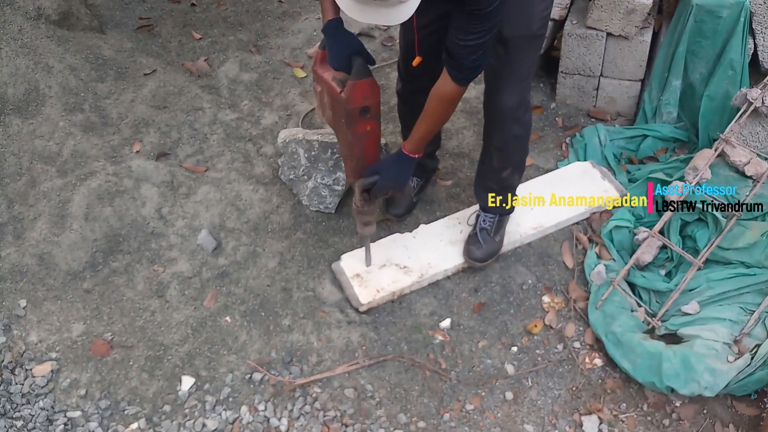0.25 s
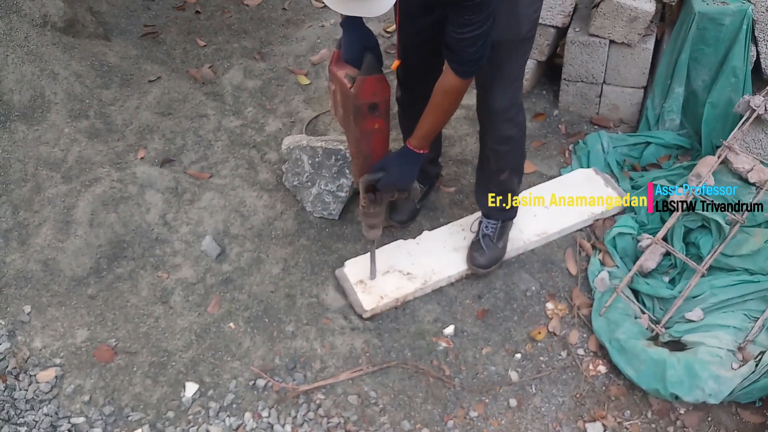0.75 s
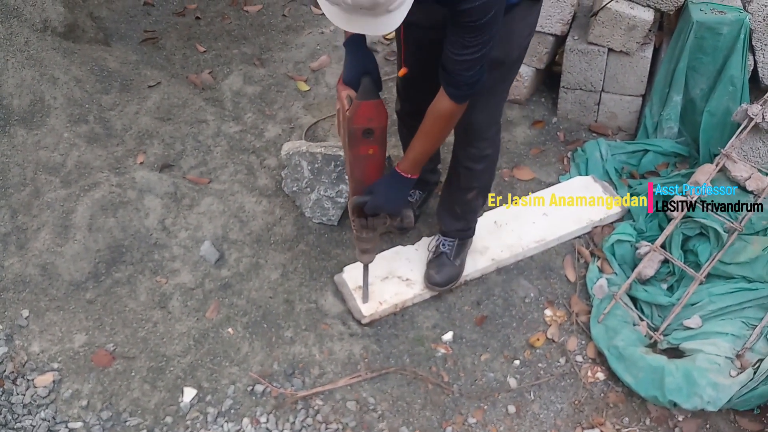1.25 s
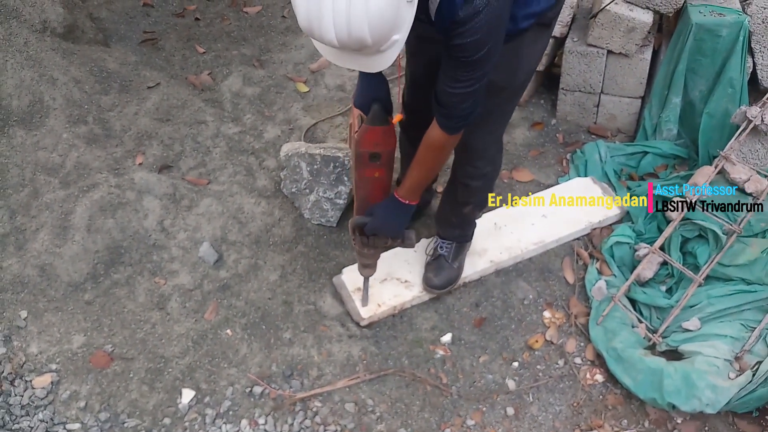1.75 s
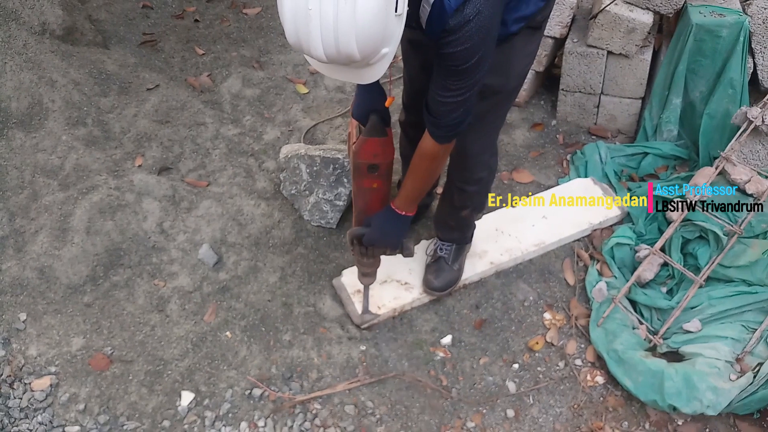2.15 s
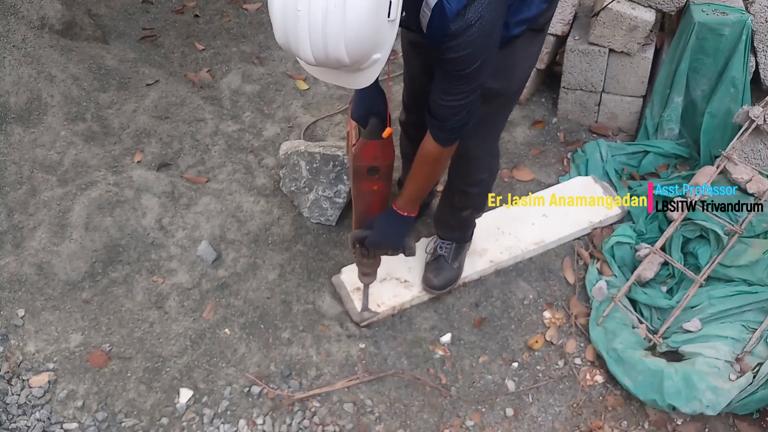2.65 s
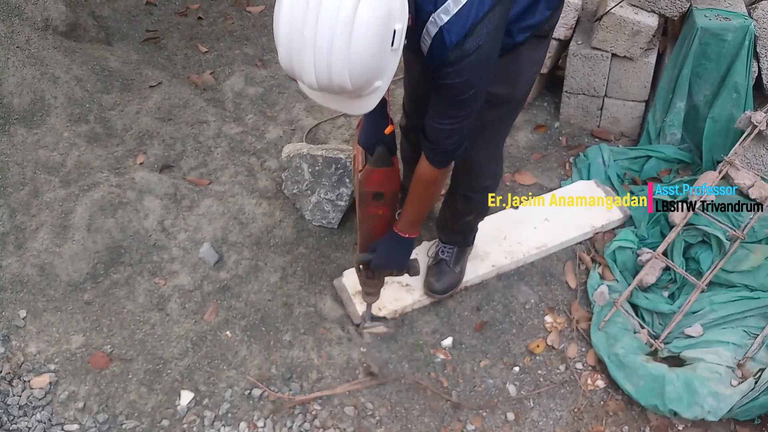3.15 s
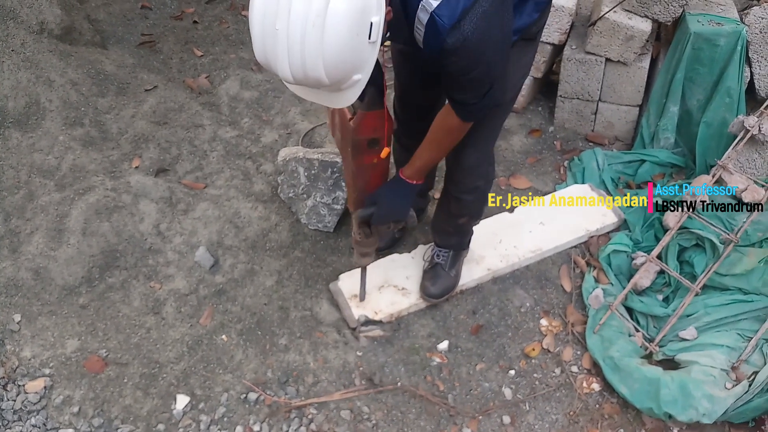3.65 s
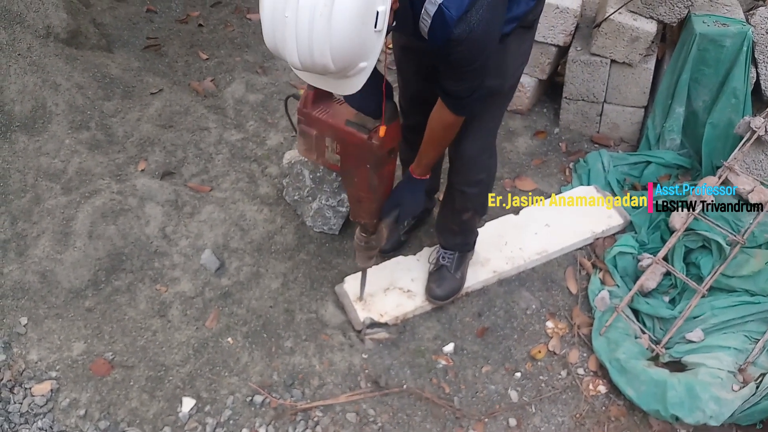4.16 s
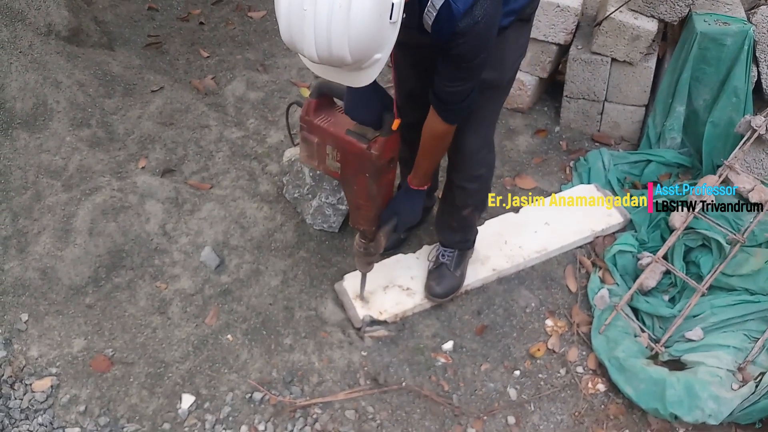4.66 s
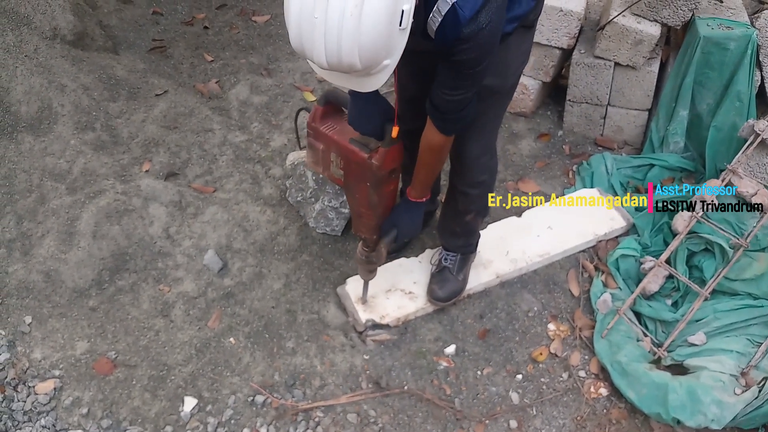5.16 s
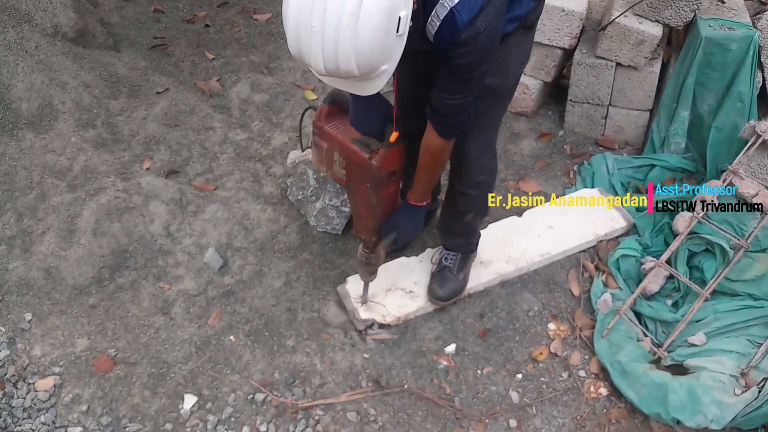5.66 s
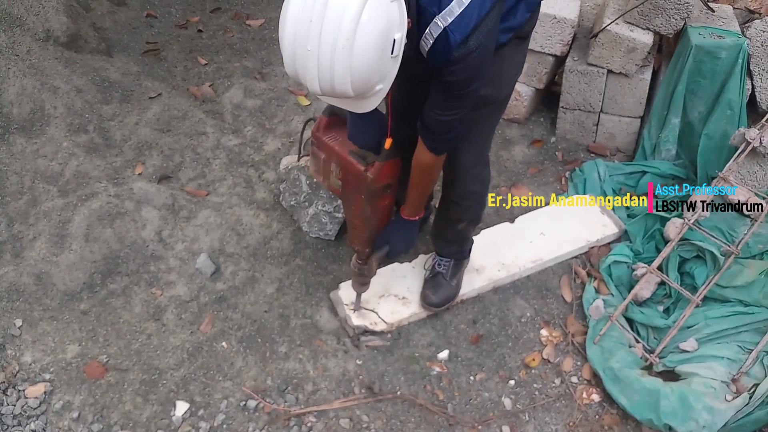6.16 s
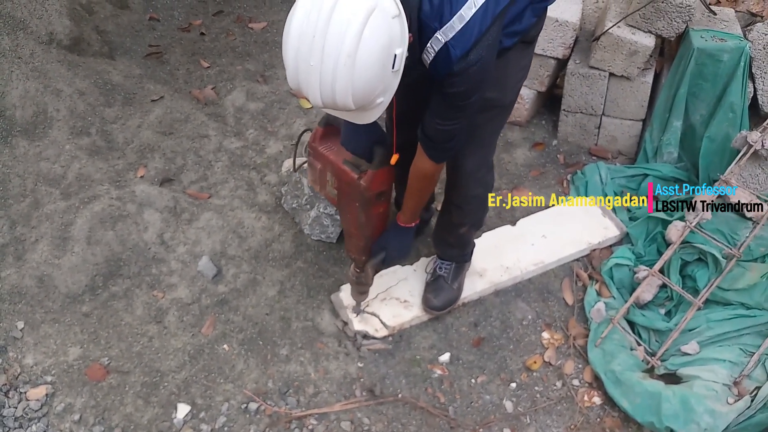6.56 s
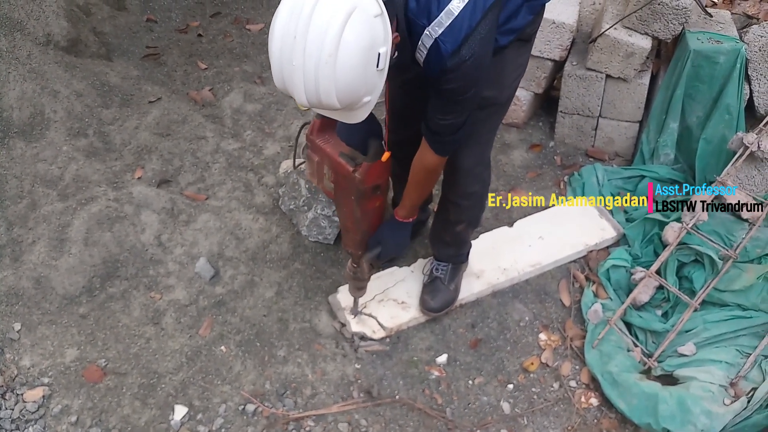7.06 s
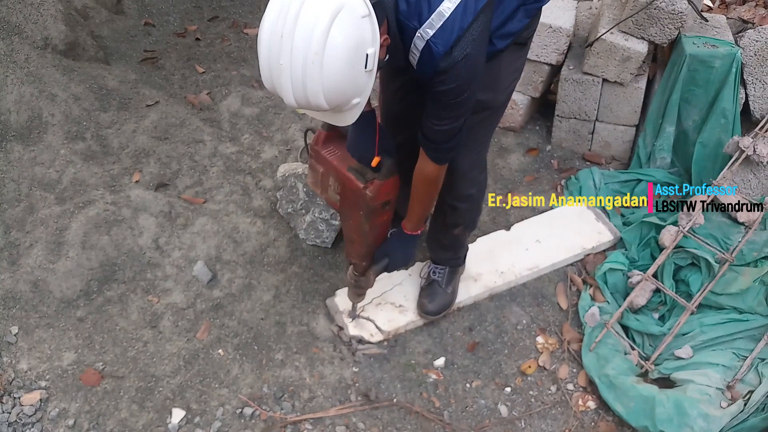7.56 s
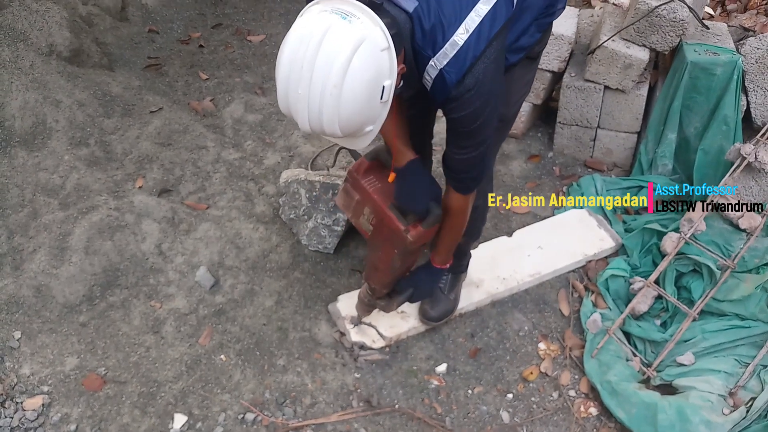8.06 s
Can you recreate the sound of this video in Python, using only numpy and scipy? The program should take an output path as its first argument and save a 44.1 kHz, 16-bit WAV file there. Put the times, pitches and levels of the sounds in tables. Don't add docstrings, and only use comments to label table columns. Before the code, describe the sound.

Motor and gear roar with rapid piston clacking speeds up, squeals briefly, and stays continuous. Quick steel-on-concrete blows come in two main spells: uneven ones at the slab edge, then a long dense run with gritty crumbling and a singing chisel. Afterwards only the machine rattles, its housing buzzing louder at the end. Open yard, faint short echoes, close small microphone with mid-heavy, slightly limited sound.

```python
import sys
import numpy as np
from scipy import signal
from scipy.fft import rfft, irfft, next_fast_len
from scipy.io import wavfile

SR = 44100
rng = np.random.default_rng(int(sys.argv[2]) if len(sys.argv) > 2 else 0)


def gain_from_decibels(decibels):
    exponent = np.asarray(decibels, float) / 20
    return 10 ** exponent


def transcribe(signal):
    frames = np.atleast_2d(signal).T
    limited = np.clip(frames, -1, 1)
    pcm = np.round(limited * 32767).astype(np.int16)
    wavfile.write(sys.argv[1], SR, pcm)


N = 366912

# start_s, speed_turns_per_s
CRANK_SPEED = [(0, 8.45), (.25, 16.13), (.6, 20.97), (1.05, 33.01), (1.5, 33.13), (2.05, 29.86),
               (2.65, 31.14), (2.95, 28.44), (3.35, 30.55), (4.4, 29.74), (5.3, 26.5), (6.0, 27.62),
               (6.55, 27.8), (6.7, 31.6), (7.2, 31.8), (8.32, 29.84)]
# start_s, roar_level_db, clack_over_roar_db
MACHINE_LEVEL = [(0.0, -31, 4.5), (0.21, -27.5, 5), (0.5, -19.5, 3), (1.0, -12.5, 2), (1.71, -15.5, 2),
                 (1.94, -18.5, 3.5), (2.32, -22.5, 2), (2.62, -24, 3.5), (3.26, -24.5, 2.5),
                 (4.15, -22.5, 6.5), (4.6, -15, 3), (5.28, -18, 0), (6.37, -21, 4), (6.67, -23, 5),
                 (7.58, -22.5, 4.5), (7.83, -20, 5.5), (8.13, -15.5, 4), (8.32, -18, 5.5)]
# pitch_hz, level_db (per Hz)
HOUSING_COLOUR = [(35, -70), (60, -49.5), (227, -16), (274, -7), (380, -5.5), (540, -5.5), (715, -12),
                  (1510, 3), (2000, -11.5), (2650, -3), (3040, -7), (4970, 0.5), (7750, -10.5), (9350, -29),
                  (16000, -27)]
# pitch_hz, width_hz, lift_db
HOUSING_RESONANCES = [(460, 47, 3), (1303, 180, -3.5), (1460, 320, -7), (2685, 64, 3.5), (4500, 280, 0.5)]
# shift_turns, gain_db, rise_s
PISTON_CLACKS = [
    (.52, 3, 0.003, 0.062, 4, 0.0028),
    (.96, 2, 0.0036, 0.12, -2, 0.0018),
]
# start_s, level_over_roar_db
COVER_BUZZ = [
    (1.6, -20),
    (1.95, -7.5),
    (2.2, -20),
    (4.1, -16),
    (4.35, -6),
    (4.85, -6.5),
    (5.1, -15),
    (7.8, -20),
    (7.95, -6),
]
# start_s, pitch_hz, level_over_roar_db
HOLDER_SINGS = [(0, 5300, -28), (1.0, 5380, -13), (2.0, 5300, -11), (4.1, 5280, -13), (4.5, 5200, -8),
                (5.0, 4950, -7.5), (5.4, 5110, -16), (7.7, 5250, -12), (8.0, 5350, -7.5)]
# start_s, level_over_roar_db
TIP_SINGS_LEVEL = [
    (5.35, -34.5),
    (5.6, -4.5),
    (6.3, -4.5),
    (6.6, -36),
]
# start_s, level_db
PINION_WHINE = [
    (6.7, -62),
    (7.0, -31),
    (7.5, -44),
    (7.8, -60),
]
# start_s, pitch_hz, level_db
GEAR_SQUEAL = [
    (.4, 1150, -60),
    (.56, 1170, -42),
    (.6, 1210, -30),
    (.64, 1290, -21),
    (.69, 1335, -30),
    (.72, 1350, -60),
]

# first_s, last_s, steel_db, slab_db, crack_db
EDGE_BLOWS = [(.0137, .0137, -44, -43, -30), (.2817, .2817, -23, -15, -10.5),
              (1.6428, 1.6428, -34, -28, -17), (1.71, 1.71, -20, -8.5, -25),
              (1.7466, 1.812, -15, -6, -11.5), (1.8433, 1.8733, -14, -7.5, -3),
              (1.9069, 2.005, -14.5, -5.5, -9), (2.0384, 2.0384, -12, -28, -4),
              (2.0812, 2.0812, -20, -7.5, -8.5), (2.1336, 2.1336, -26.5, -3.5, -13),
              (2.172, 2.24, -21, -5, -5.5), (2.3393, 2.3393, -27, -37, -15),
              (2.3817, 2.3817, -36, -25, -17), (2.7269, 2.7618, -20, -2.5, -10),
              (2.7954, 2.894, -17, -2, -3), (2.9363, 2.9363, -24, -14, -8),
              (2.9658, 2.9658, -21.5, -5.5, -5.5), (2.9979, 2.9979, -13, -2.5, -4),
              (3.0826, 3.0826, -26, -31, -13.5), (3.156, 3.1978, -34, -28, -23)]
BITE_BLOWS = [(4.5228, 4.5612, -35.5, -19, -20), (4.605, 4.672, -13, -11, -8),
              (4.706, 4.7058, -7, -7, -6.5), (4.779, 4.7792, -16, -10, -7),
              (4.8123, 4.8475, -6.5, -11.5, -5.5)]
MIDDLE_BLOWS = [(4.9219, 4.9219, -19, -12, -8), (4.9564, 5.1016, -12.5, -8, -6),
                (5.1388, 5.2885, -16.5, -10, -5.5), (5.326, 5.3998, -18, -11.5, -5)]
CRACKED_BLOWS = [(5.4377, 5.5869, -13, -7.5, -5.5), (5.6234, 5.7346, -11, -11, -5),
                 (5.77, 5.9167, -12, -8, -5.5), (5.9534, 6.243, -10.5, -8.5, -6.5),
                 (6.279, 6.4218, -12, -13, -4.5), (6.457, 6.5675, -13, -18, -4.5),
                 (6.6474, 6.6474, -43, -11, -15), (6.6884, 6.6884, -38, -32, -30)]
# pitch_hz, level_db, t60_s
STEEL_MODES = [(10740, 0.5, 0.045), (11350, -0.5, 0.048), (12270, 4.5, 0.061), (11960, 2.5, 0.15),
               (13300, -5, .02), (14540, 1.5, 0.11)]
# pitch_hz, level_db, t60_s
EDGE_MODES = [(366, -7, 0.015), (1114, 5, 0.043), (1517, 12, 0.019), (1873, 4.5, 0.022), (2370, -3, 0.013)]
BITE_MODES = [(480, -4, 0.028), (919, 3, 0.05), (1260, -4, 0.02), (1680, 6, 0.02), (2240, -6, 0.016)]
MIDDLE_MODES = [(480, 0, 0.029), (907, 0.5, 0.064), (1496, 11.5, 0.023), (1693, 12.5, 0.023),
                (2190, 9, 0.02)]
CRACKED_MODES = [(318, -3, 0.028), (555, 1.5, 0.03), (1274, 1.5, 0.029), (1560, 5.5, 0.02),
                 (2543, -0.5, 0.031)]
# pitch_hz, level_db (per Hz)
GRIT_COLOUR = [(88, -36), (150, -6), (551, -4.5), (780, -12), (1200, 1.5), (1960, -5.5), (2630, -2.5),
               (3070, -4.5), (6370, -2), (7710, -6), (9500, -38), (12400, -61), (20900, -120)]
# start_s, thud_db
SLAB_SEATING = [(1.8433, -27), (2.0384, -27), (2.172, -41), (2.2055, -19), (2.24, -32), (2.796, -28),
                (2.8287, -31), (2.861, -27), (2.894, -30), (4.672, -39), (4.7046, -24), (5.067, -36),
                (5.249, -26), (5.29, -18), (5.99, -41)]

FIRST_TURN = 0.21
ROTOR_PER_TURN, COVER_PER_TURN = 8.5, 119
WORK_SPEED, BOOM_SPEED = 30.9, 22
BRIGHT_DB, DULL_DB_PER_SPEED, DULLEST_DB, LEAN_DULL = 2, 0.46, -18, 0.76
BASS_DB, BOOM_DB_PER_SPEED = 0.78, 0.75
ROTOR_DB, FREE_SPEED, ROTOR_FADE_DB_PER_SPEED = -20.5, 30.1, 3
STEEL_SPREAD_DB, SLAB_SPREAD_DB, CRACK_SPREAD_DB, THUD_SPREAD_DB = 1.5, 1.5, 1.0, 1.2
SHANK_HZ, SHANK_SHARE, TIP_HZ, TIP_SPREAD_HZ = 5430, 0.3, 6850, 200
SINK_S, SINK_HZ, SINK_HZ_PER_S = 5.5, 5520, 1760
COLLAR_HZ, COLLAR_DB, COLLAR_T60_S = 7400, -11, 0.052


def machine():
    level_db, clack_db = in_time(MACHINE_LEVEL)
    roar = gear_roar()
    clacks = piston_clacks(clack_db)
    body = housing(roar + clacks, clack_db)
    rings = loose_parts(clacks + 0.3 * roar)
    return gain_from_decibels(level_db + 1.0) * (body + rings)


def gear_roar():
    turns = crank()[1]
    return rng.standard_normal(N) * gain_from_decibels(1.52 * np.cos(2 * np.pi * (turns - 0.8)))


def piston_clacks(clack_db):
    spikes_db = 3.0 * np.minimum(rng.exponential(1, N), 4)
    rattle = unit(rng.standard_normal(N) * gain_from_decibels(spikes_db))
    clacks = gain_from_decibels(clack_db) * rattle * clack_gate(crank()[1])
    band = signal.butter(2, [220, 8500], "band", fs=SR, output="sos")
    return signal.sosfilt(band, clacks)


def clack_gate(turns):
    gate, t = np.zeros(N), np.arange(N) / SR
    whole = np.arange(int(turns[-1]) + 1)
    rows = strikes(EDGE_BLOWS + BITE_BLOWS + MIDDLE_BLOWS + CRACKED_BLOWS)
    struck = [np.interp(row[0], t, turns) for row in rows if row[1] > -26]
    loaded = np.isin(whole, np.round(np.array(struck) - 0.8))
    x = np.arange(-500, 600) / SR
    for place, level_db, decay_s, shift, load_db, rise_s in PISTON_CLACKS:
        chance = rng.standard_normal((len(whole), 2))
        place_turns = whole + place + shift * loaded + 0.033 * chance[:, 0]
        at = np.interp(place_turns, turns, t) * SR
        strength_db = level_db + load_db * loaded + 0.98 * chance[:, 1]
        clicks = np.zeros((2, N))
        clicks[loaded * 1, np.minimum(at.astype(int), N - 1)] = gain_from_decibels(strength_db) * (at < N - 2)
        for train, attack_s in zip(clicks, (0.0012, rise_s)):
            bump = np.where(x < 0, np.exp(-(x / attack_s) ** 2), np.exp(-np.abs(x) / decay_s))
            gate += signal.fftconvolve(train, bump)[500:500 + N]
    return gate


def housing(drive, clack_db):
    speed = crank()[0]
    slow_dulling_db = DULL_DB_PER_SPEED * np.maximum(WORK_SPEED - speed, 0)
    tilt_db = np.maximum(BRIGHT_DB - slow_dulling_db - LEAN_DULL * clack_db, DULLEST_DB)
    bass_db = BASS_DB + BOOM_DB_PER_SPEED * np.maximum(BOOM_SPEED - speed, 0)
    body, hz = colour(drive, HOUSING_COLOUR, HOUSING_RESONANCES)
    body = body / np.std(back(body))
    octaves = np.clip(np.log2(hz / 3000), -3, 3)
    out = 0
    for k in range(-3, 4):
        share = np.clip(1 - np.abs(octaves - k), 0, 1)
        gain_db = tilt_db * k if k > 0 else -bass_db * k / 3
        out = out + back(body * share) * gain_from_decibels(gain_db)
    return out


def loose_parts(shake):
    cover_hz = COVER_PER_TURN * np.maximum(crank()[0], 27.5)
    tip_hz = SINK_HZ + SINK_HZ_PER_S * np.clip(np.arange(N) / SR - SINK_S, 0, 1)
    rings = loose_part(cover_hz, *in_time(COVER_BUZZ), shake, width_hz=170)
    rings = rings + loose_part(*in_time(HOLDER_SINGS), shake, width_hz=190)
    rings = rings + loose_part(tip_hz, *in_time(TIP_SINGS_LEVEL), shake, width_hz=280)
    return signal.sosfiltfilt(signal.butter(6, 8400, "low", fs=SR, output="sos"), rings)


def loose_part(hz, level_db, shake, width_hz):
    carrier = np.exp(2j * np.pi * np.cumsum(hz) / SR)
    slow = signal.lfilter([1], [1, -np.exp(-np.pi * width_hz / SR)], shake / carrier)
    return gain_from_decibels(level_db) * unit((slow * carrier).real)


def motor_tones():
    speed, turns = crank()
    held_back = np.maximum(FREE_SPEED - speed, 0)
    rotor_db = in_time(MACHINE_LEVEL)[0] + ROTOR_DB - ROTOR_FADE_DB_PER_SPEED * held_back
    angle = 2 * np.pi * ROTOR_PER_TURN * turns
    rotor = np.sqrt(2) * gain_from_decibels(rotor_db) * np.sin(angle)
    whine = gain_from_decibels(in_time(PINION_WHINE)[0]) * np.sin(angle * 17 + 1.5 * np.sin(angle / 8.5))
    squeal_hz, squeal_db = in_time(GEAR_SQUEAL)
    flutter = 1 + 0.73 * np.sin(angle / 7.7)
    squeal = gain_from_decibels(squeal_db) * flutter * np.sin(2 * np.pi * np.cumsum(squeal_hz) / SR)
    return rotor + whine + squeal * (squeal_db > -54)


def crank():
    speed, = in_time(CRANK_SPEED)
    return speed, FIRST_TURN + np.cumsum(speed) / SR


def strikes(runs):
    turns, t = crank()[1], np.arange(N) / SR
    rows = []
    for first, last, *levels in runs:
        steps = int(np.round(np.interp(last, t, turns) - np.interp(first, t, turns)))
        for s in np.linspace(first, last, 1 + steps):
            rows.append((s, *levels))
    return np.array(rows)


def blows(runs, slab, free, steel_gain_db, hiss_db, thud_gain_db, sinking):
    out, t = np.zeros(N + SR), np.arange(int(0.12 * SR)) / SR
    rows = strikes(runs)
    luck = rng.standard_normal((len(rows), 5))
    rows[:, 1:] += luck[:, :3] * [STEEL_SPREAD_DB, SLAB_SPREAD_DB, CRACK_SPREAD_DB]
    tip_hz = SINK_HZ + SINK_HZ_PER_S * (rows[:, 0] - SINK_S) if sinking else TIP_HZ
    tip_hz = tip_hz + TIP_SPREAD_HZ * luck[:, 3]
    rings_hz = np.where(rng.random(len(rows)) < SHANK_SHARE, SHANK_HZ, tip_hz)
    thuds_db = rows[:, 3] + thud_gain_db + THUD_SPREAD_DB * luck[:, 4]
    for (s, steel_db, slab_db, crack_db), thud_db, ring_hz in zip(rows, thuds_db, rings_hz):
        hit = gain_from_decibels(steel_db + steel_gain_db) * chisel_steel(t, free)
        hit += gain_from_decibels(slab_db - 4.5) * slab_knock(t, slab)
        hit += gain_from_decibels(crack_db - 2) * chisel_ring(t, ring_hz, sinking)
        hit += gain_from_decibels(thud_db - 5.5) * ground_thud(t)
        at = max(round(s * SR), 0)
        out[at:at + len(t)] += hit
    return out[:N] + grit_spray(rows, hiss_db)


def chisel_steel(t, free):
    steel = struck_modes(STEEL_MODES, t, level_spread_db=3.4, detune=0.0036, t60_scale=free)
    chatter_pole = np.exp(-2 * np.pi * 300 / SR)
    chatter = signal.lfilter([1], [1, -chatter_pole], rng.standard_normal(len(t)))
    return steel * (1 - np.exp(-t / 0.0014)) * unit(1 + 1.5 * unit(chatter))


def slab_knock(t, slab):
    swell = (1 - np.exp(-t / 0.0012)) ** 2
    return swell * struck_modes(slab, t, level_spread_db=1.33, detune=0.012)


def chisel_ring(t, ring_hz, sinking):
    spread = rng.standard_normal(2)
    ring = gain_from_decibels(0.77 * spread[0]) * mode(ring_hz, 0.03, t) * (1 - np.exp(-t / 0.00062))
    if sinking:
        return ring
    return ring + gain_from_decibels(COLLAR_DB + 1.74 * spread[1]) * mode(COLLAR_HZ, COLLAR_T60_S, t)


def ground_thud(t):
    late = t - 0.014
    return -np.sin(2 * np.pi * 84 * late) * np.exp(-(late / 0.02) ** 2)


def grit_spray(rows, hiss_db):
    at = np.maximum(np.round(rows[:, 0] * SR).astype(int), 0)
    crack_db, fine_db = rows[:, 3], rows[:, 1] + hiss_db
    grit = unit(back(colour(rng.standard_normal(N), GRIT_COLOUR)[0]))
    treble = signal.butter(4, 10500, "high", fs=SR, output="sos")
    hiss = unit(signal.sosfilt(treble, rng.standard_normal(N)))
    spray = dying(at, gain_from_decibels(crack_db - 3.5), 0.032) - dying(at, gain_from_decibels(crack_db + 4.5), 0.0019)
    spray += dying(at, gain_from_decibels(crack_db - 15.0), 0.16)
    puff = dying(at, gain_from_decibels(fine_db), 0.012) - dying(at, gain_from_decibels(fine_db + 13), 0.0047)
    return grit * spray + hiss * puff


def ground():
    out, t = np.zeros(N + SR), np.arange(int(0.05 * SR)) / SR
    push = np.sin(2 * np.pi * 85 * t) * np.exp(-(t / 0.011) ** 2)
    for s, thud_db in SLAB_SEATING:
        at = round(s * SR)
        out[at:at + len(t)] -= gain_from_decibels(thud_db + 2.5) * push
    return out[:N]


def yard(x):
    dull = signal.lfilter([0.5], [1, -0.5], x)
    out = x.copy()
    for lag_s, level_db in [(0.0032, -15.5), (0.0075, -22), (0.016, -24)]:
        shift = round(lag_s * SR)
        out[shift:] += gain_from_decibels(level_db) * dull[:-shift]
    return out


def mode(hz, t60, t):
    return np.sin(2 * np.pi * hz * t) * gain_from_decibels(-60 * t / t60)


def struck_modes(modes, t, level_spread_db, detune, t60_scale=1):
    out = np.zeros(len(t))
    for hz, level_db, t60 in modes:
        a, b = rng.standard_normal(2)
        out += gain_from_decibels(level_db + level_spread_db * a) * mode(hz * (1 + detune * b), t60 * t60_scale, t)
    return out


def dying(at, gains, t60):
    clicks = np.full(N, 1e-18)
    clicks[at] = gains
    return signal.lfilter([1], [1, -gain_from_decibels(-60 / (t60 * SR))], clicks)


def unit(x):
    return x / np.sqrt(np.mean(x ** 2) + 1e-20)


def in_time(rows):
    s, *columns = np.transpose(rows)
    return [np.interp(np.arange(N) / SR, s, c) for c in columns]


def colour(x, curve, peaks=()):
    size = next_fast_len(N)
    hz = np.maximum(np.arange(size // 2 + 1) * SR / size, 1)
    curve_hz, curve_db = np.transpose(curve)
    shape_db = np.interp(np.log(hz), np.log(curve_hz), curve_db)
    for peak_hz, width_hz, lift_db in peaks:
        shape_db = shape_db + lift_db / (1 + (2 * (hz - peak_hz) / width_hz) ** 2)
    return rfft(x, size) * gain_from_decibels(shape_db), hz


def back(spectrum):
    return irfft(spectrum, next_fast_len(N))[:N]


def scene():
    hits = blows(EDGE_BLOWS, EDGE_MODES, free=0.77, steel_gain_db=-12.5, hiss_db=-27,
                 thud_gain_db=-47, sinking=False)
    hits += blows(BITE_BLOWS, BITE_MODES, free=0.66, steel_gain_db=-14, hiss_db=-20,
                  thud_gain_db=-38, sinking=False)
    hits += blows(MIDDLE_BLOWS, MIDDLE_MODES, free=0.8, steel_gain_db=-14, hiss_db=-16,
                  thud_gain_db=-33, sinking=False)
    hits += blows(CRACKED_BLOWS, CRACKED_MODES, free=0.4, steel_gain_db=-15, hiss_db=-11,
                  thud_gain_db=-38, sinking=True)
    return (machine() + motor_tones() + yard(hits + ground()))[None]


def top_cut(x):
    return signal.sosfilt(signal.butter(12, 16440, fs=SR, output="sos"), x)


def record(dry):
    knee = 4
    rounded = 0.9 * dry / (1 + np.abs(dry / 1.03) ** knee) ** (1 / knee)
    limited = signal.sosfilt(signal.butter(2, 25, "high", fs=SR, output="sos"), rounded)
    return top_cut(limited)


dry = scene()
out = record(dry)
transcribe(out)
```